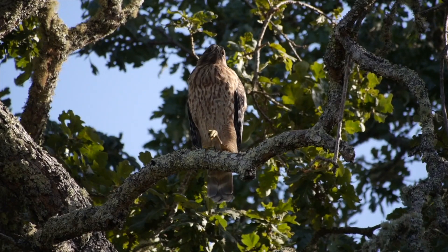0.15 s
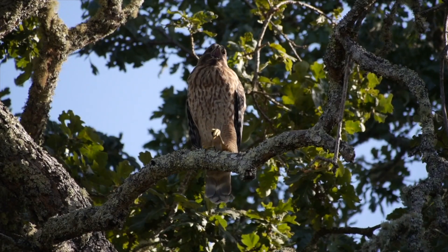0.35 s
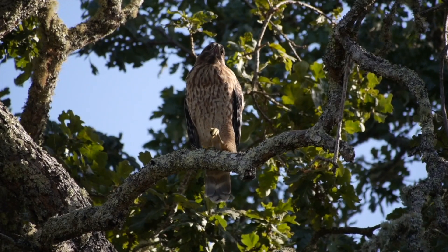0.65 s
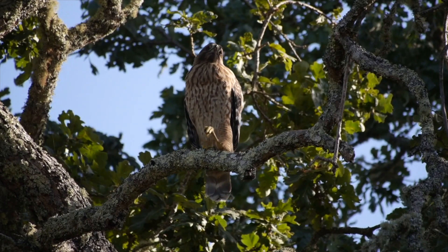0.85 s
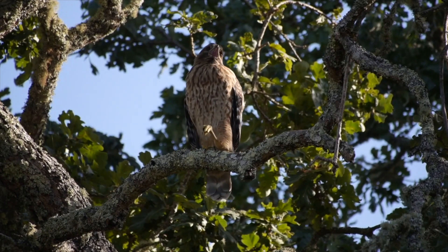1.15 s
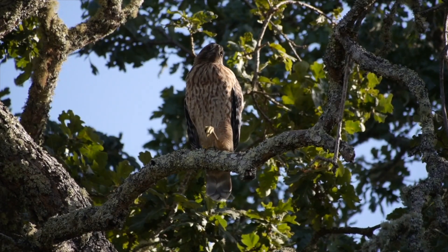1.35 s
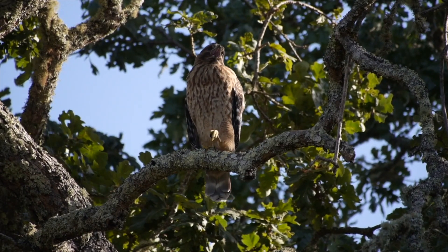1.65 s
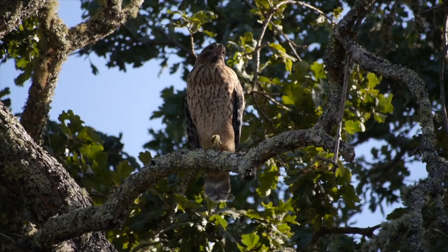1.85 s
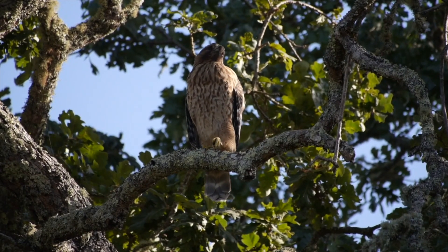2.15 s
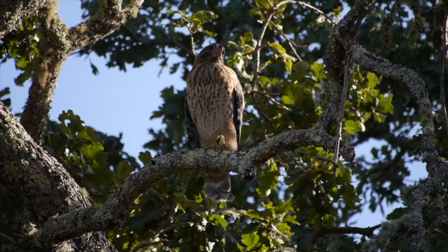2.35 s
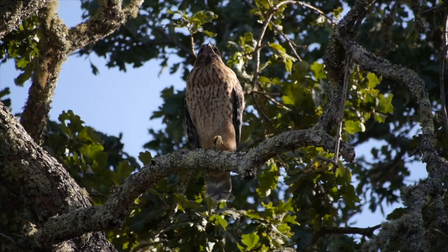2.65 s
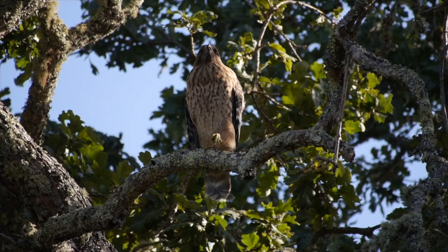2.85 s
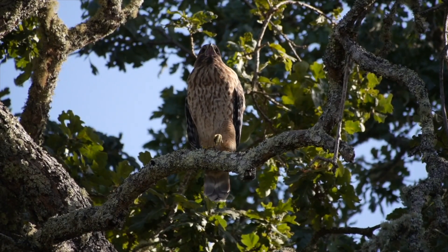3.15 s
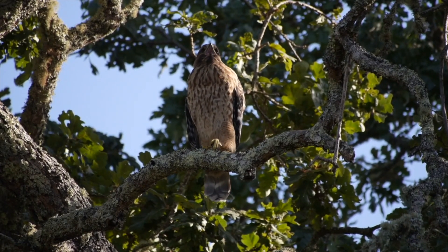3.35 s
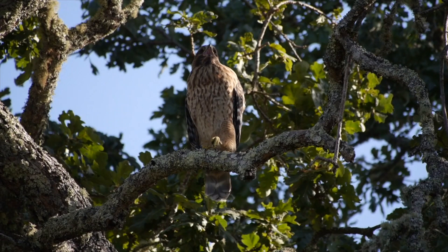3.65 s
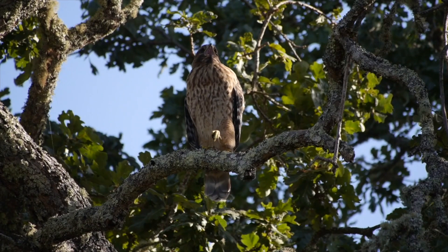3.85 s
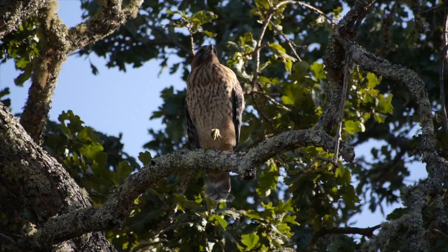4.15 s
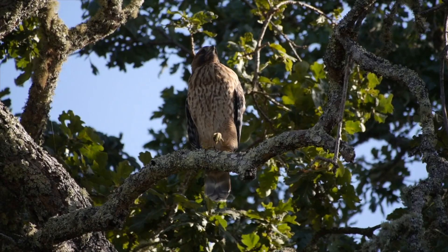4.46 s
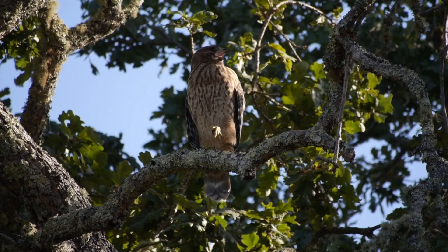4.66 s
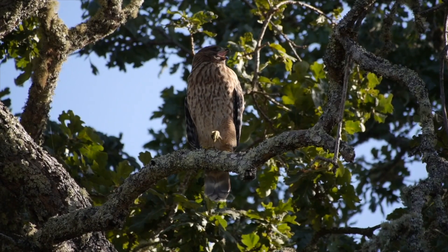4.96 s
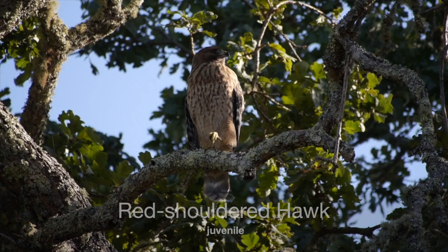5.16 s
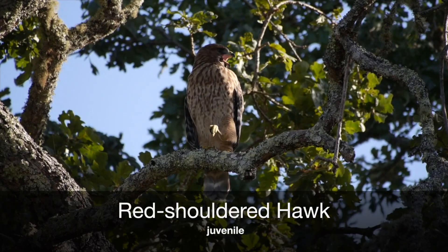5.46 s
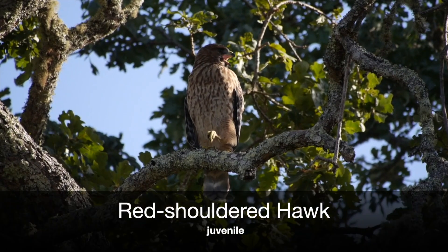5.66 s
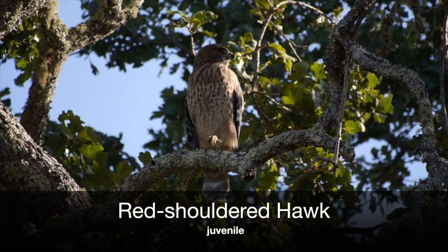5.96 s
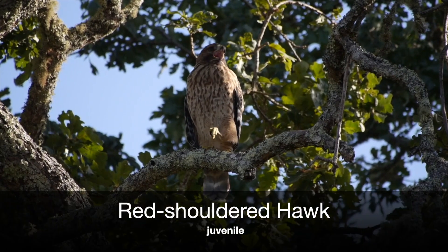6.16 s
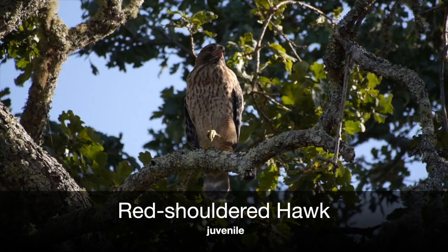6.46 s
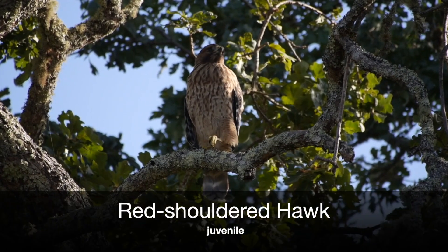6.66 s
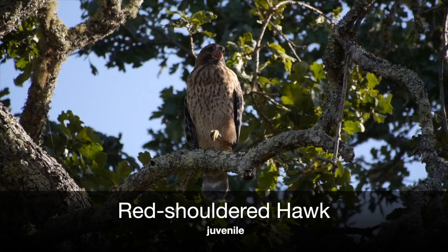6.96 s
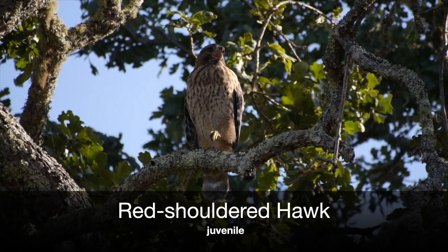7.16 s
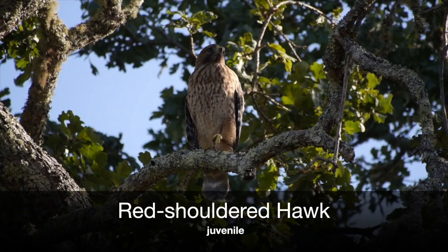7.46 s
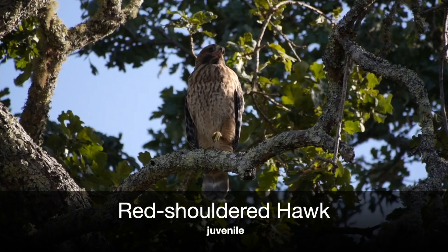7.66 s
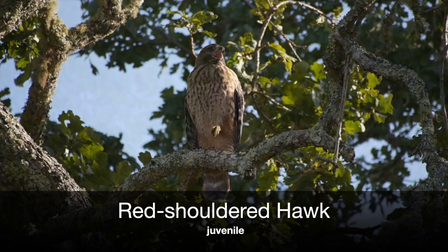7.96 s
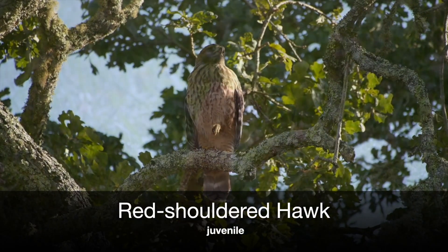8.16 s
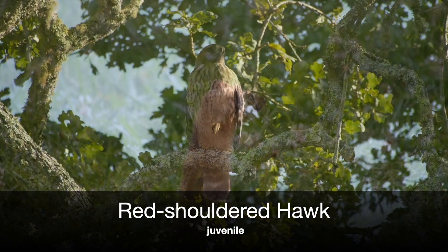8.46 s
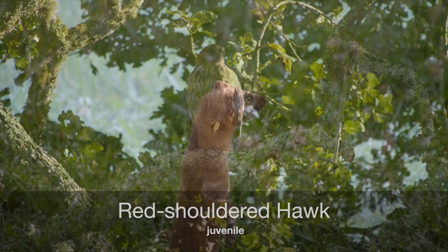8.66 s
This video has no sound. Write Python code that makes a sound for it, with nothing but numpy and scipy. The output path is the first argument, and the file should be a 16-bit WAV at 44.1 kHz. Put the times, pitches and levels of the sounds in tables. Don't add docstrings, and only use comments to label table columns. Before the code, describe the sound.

Outdoors among trees, a hawk is already mid-scream at the start and keeps calling at regular intervals: bright, piercing, downward-sliding notes with a rough ending and a brief woodland reverberation. The background is hushed, with far road rumble, a faint wavering machine tone, small dry ticks, and one tiny bird chirp at six seconds. Calling stops just after eight seconds, leaving faint low motor drone and a few sharper twig clicks. Wide, natural stereo pickup.

```python
import sys
import numpy as np
from scipy import signal
from scipy.fft import rfft, irfft, next_fast_len
from scipy.io import wavfile
from scipy.ndimage import uniform_filter1d

SR = 44100
rng = np.random.default_rng(int(sys.argv[2]) if len(sys.argv) > 2 else 0)


def amplitude_ratio(level_db):
    exponent = np.asarray(level_db, float) / 20
    return 10 ** exponent


def persist_wave(psi):
    counts = np.round(np.clip(psi, -1, 1) * 32767).astype(np.int16)
    wavfile.write(sys.argv[1], SR, np.atleast_2d(counts).T)


N = 388962
SIZE = next_fast_len(N + SR, True)


def along(rows, hz):
    f, db = np.transpose(rows)
    return np.interp(np.log(hz + 1), np.log(f), db)


def colour(x, rows):
    size = next_fast_len(x.shape[-1], True)
    gain = amplitude_ratio(along(rows, np.fft.rfftfreq(size, 1 / SR)))
    return irfft(rfft(x, size) * gain, size)[..., :x.shape[-1]]


def level(x, db):
    return x * amplitude_ratio(db) / np.sqrt(np.mean(x ** 2))


def walk(rate, size=N):
    k = max(int(SR / rate), 2)
    smooth = uniform_filter1d(rng.standard_normal(size), k)
    return level(uniform_filter1d(smooth, k), 0)


def pan(x, db):
    return np.array([x * amplitude_ratio(db / 2), x * amplitude_ratio(-db / 2)])


def place(out, x, s):
    i = int(s * SR)
    return slice(i, i + x.shape[-1]), slice(0, out.shape[-1] - i)


def stages(arch, slide, croak):
    # effort/dB, brightness/dB
    stage_db = [(2.1, 8.5), (3.5, 5), (0.2, 1.5), (4, 3.5), (0.3, 8), (1.8, 4), (0, -0.2), (0.5, -0.5),
                (0.5, 1), (-2.5, 0.6), (-4.5, -4), (-2, -4)]
    start, rise, knee, top_hz, db = arch
    held, shelf, bend, bend_hz, droop_hz = slide
    snap, croak_hz, length, fade_db, bright_db = croak
    slip_s, droop_s, drop_s = 0.025, 0.04, 0.008
    s = [0, rise, (rise + knee) / 2, knee, knee + slip_s, shelf - abs(held), shelf, bend]
    s += [snap - droop_s, snap, snap + drop_s, snap + drop_s + length]
    hz = [1423, top_hz - 14.2, top_hz, top_hz - 41.6, 1540, 1477, 1435, bend_hz]
    hz += [droop_hz, 1158.6, croak_hz, 764]
    effort_db, shine_db = np.transpose(stage_db)
    is_end = np.arange(len(s)) == len(s) - 1
    effort_db = effort_db + db + fade_db * is_end
    return list(zip(start + np.maximum.accumulate(s), hz, effort_db, shine_db + bright_db))


def scream(rows):
    # lead before the first row t/s, f/Hz, drop under it level/dB, brightness change/dB
    crack = [
        (.017, 766, -8.5, 15.5),
        (0.01514, 830, -16.5, -9.5),
        (0.00828, 1000, 0, -9.5),
        (0.00238, 1350, -11.5, 1.5),
    ]
    order_db = [-0.5, -6.5, -9.5, -14, -18, -13, -16, -12, -17, -12, -29, -6, -15.5]
    # f/Hz, level/dB
    throat = [(700, -41.5), (1600, -12), (2100, 2.5), (2550, 6), (3000, -3), (3500, -12), (4300, -19),
              (5200, -12.5), (6200, -17), (8000, -18.5), (10000, -31), (12500, -29), (15500, -42.5)]
    # f/Hz, level/dB
    fundamental = [(750, -21.5), (1200, -16), (1400, -10), (1730, -2.5)]
    # f/Hz, level/dB
    breathiness = [(800, -15.5), (1080, -14), (1200, -48.5), (1450, -35.5), (1700, -31)]
    # f/Hz, level/dB
    rasp = [(1200, -22), (1900, -9.5), (2500, 7), (3100, -5), (3800, -17), (5500, -24), (8000, -36),
            (15500, -50)]
    # f/Hz, level/dB
    turn = [(7000, 0), (10000, 4.5), (12500, 2), (15000, -12)]
    turn_s = 4.45

    s, _, db, bright = rows[0]
    rows = [(s - lead, hz, db + under, bright + dull) for lead, hz, under, dull in crack] + rows
    s, *columns = np.transpose(rows)
    t = np.arange(s[0], s[-1], 1 / SR)
    age = t - s[0]
    curves = [uniform_filter1d(np.interp(t, s, c), size=180, mode="nearest") for c in columns]
    hz, effort_db, bright_db = curves

    low = 1 / (1 + np.exp((hz - 1120) / 40))
    jitter = (0.0025 + 0.006 * low) * walk(400, size=len(t))
    hz = hz * (1 + jitter + 0.0022 * walk(66, size=len(t)))
    phase = 2 * np.pi * np.cumsum(hz) / SR
    gape = 1 + 0.083 * np.exp(-age / 0.069)

    voice = amplitude_ratio(along(fundamental, hz)) * np.sin(phase)
    for k, db in enumerate(order_db, 2):
        flutter_db = 0.68 * min(k, 6) * walk(65, size=len(t))
        gain_db = db * (1 - 0.27 * low) + along(throat, k * hz / gape)
        gain_db = gain_db + bright_db * min((k - 2) / 2, 1.6) + flutter_db
        gain_db = gain_db - 4.0 * max(k - 5, 0) * np.exp(-age / 0.062)
        gain_db = gain_db + along(turn, k * hz) * (s[0] > turn_s)
        can_sound = k * hz < 0.45 * SR
        voice = voice + amplitude_ratio(gain_db) * can_sound * np.sin(k * phase + 6 * rng.random())

    breath = level(colour(rng.standard_normal(len(t)), rasp), 0)
    breath = breath * (1 + 0.42 * np.cos(phase)) * amplitude_ratio(5.1 * walk(70, size=len(t)))
    slips = np.clip(walk(40, size=len(t)) - 0.6, 0, 1) * np.clip((hz - 1500) / 100, 0, 1)
    voice = voice + amplitude_ratio(-14.5) * slips * np.sin(3 * phase / 2)
    voice = voice + breath * amplitude_ratio(along(breathiness, hz))
    edges = np.clip(np.minimum(age / 0.0015, (s[-1] - t) / 0.0087), 0, 1)
    return s[0], voice * amplitude_ratio(effort_db) * edges


def hawk():
    # start t/s, rise t/s, knee after start t/s, top f/Hz, effort level/dB
    arches = [(-0.208, 0.043, 0.09, 1717, -31.5), (0.442, 0.038, 0.097, 1749, -31.5),
              (1.085, 0.042, 0.089, 1753, -30.5), (1.727, 0.044, 0.103, 1742, -30.5),
              (2.384, 0.042, 0.12, 1728, -30.5), (3.118, 0.042, 0.1, 1736, -30.5),
              (3.82, 0.044, 0.11, 1732, -30.5), (4.668, 0.04, 0.12, 1712, -31),
              (5.428, 0.041, 0.091, 1664, -30.5), (6.211, 0.044, 0.1, 1721, -30.5),
              (6.966, 0.05, 0.1, 1717, -30.5), (7.835, 0.061, 0.11, 1723, -31)]
    # shelf held t/s, shelf left at t/s, bend at t/s (both after start), bend f/Hz, droop f/Hz
    slides = [(0.0232, 0.18, 0.249, 1291, 1200), (0.04, 0.172, 0.218, 1287, 1217),
              (0.0088, 0.176, 0.27, 1296, 1236), (0.021, 0.193, 0.217, 1354, 1232),
              (-0.009, 0.185, 0.271, 1269, 1246), (0.018, 0.166, 0.266, 1295, 1236),
              (0.025, 0.2, 0.267, 1295, 1224), (-0.006, 0.192, 0.257, 1393, 1226),
              (0.044, 0.179, 0.203, 1354, 1260), (0.051, 0.208, 0.232, 1334, 1253),
              (0.007, 0.181, 0.283, 1299, 1254), (0.015, 0.196, 0.239, 1353, 1281)]
    # voice breaks after start t/s, drops to f/Hz, length t/s, fade/dB, whole scream's brightness/dB
    croaks = [(.361, 750, 0.03, -37, 0.5), (.347, 827, .03, -24, 1), (.359, 842, .03, -14, 1),
              (.341, 813, 0.021, -22, 1), (.457, 842, .032, -15, 0.5), (.387, 874, 0.032, -8, 1),
              (.399, 890, 0.036, -10.5, 1), (.445, 990, .06, -9, -2.5), (.383, 1053, .072, -7, -5),
              (.385, 1050, .052, -3, -1.5), (.403, 1013, .056, -8, -1), (.393, 1036, .056, -7, -2)]
    # f/Hz, level/dB
    ground = [(500, -12.5), (1300, -2.6), (2700, -1.0), (4000, 3), (7000, -15), (15000, -16.5)]
    # delay t/s, time to fade by 60 dB t/s, level/dB, treble slope/dB per octave
    trees = [
        (.003, 0.19, -5.5, 3.5),
        (0.021, 0.35, -16.5, -0.5),
        (0.049, 2.2, -29.5, 0),
    ]
    # f/Hz, level/dB
    trees_colour = [(500, 5), (2500, -1.5), (4000, 6), (6000, 4), (9000, -2.5), (15000, 1)]
    # f/Hz, left minus right level/dB
    hawk_pan = [(700, 6), (1500, -2), (2600, -2.5), (4400, -3.5), (8000, 5.5), (12000, 5.5), (15000, 3.5)]

    lead = SR
    calls = np.zeros(SIZE)
    for plan in zip(arches, slides, croaks):
        s, voice = scream(stages(*plan))
        into, _ = place(calls, voice, s + 1)
        calls[into] += voice

    f = np.fft.rfftfreq(len(calls), 1 / SR)
    comb_hz = np.array([[171.7], [171.5]])
    ground_shift_hz = 19
    bounce = amplitude_ratio(along(ground, f)) * np.exp(-2j * np.pi * (f - ground_shift_hz) / comb_hz)
    near = irfft(rfft(calls) * (1 + bounce) * pan(0.84, along(hawk_pan, f)), len(calls))

    t = np.arange(2 * SR) / SR
    scatter = 0
    for delay, t60, db, treble_db in trees:
        mid, side = colour(rng.standard_normal((2, len(t))), [(3000, 0), (12000, 2 * treble_db)])
        tail = np.array([mid + 0.74 * side, mid - 0.17 * side])
        tail = tail * (t > delay) * 1000. ** (-t / t60)
        scatter = scatter + amplitude_ratio(db) * tail / np.sqrt(np.sum(tail ** 2) / 2)
    wet = signal.fftconvolve(colour(calls, trees_colour)[None], scatter, axes=1)[:, :len(calls)]
    return (near + wet)[:, lead:lead + N]


def motor(t):
    # f/Hz, level/dB
    tones = [(80.5, -9), (123.8, -8), (161.5, -3), (177.6, -4.5), (242.2, -9), (322, -14), (403.7, -5.5),
             (942, -13.5), (1120, -19), (1281, -19)]
    # f/Hz, level/dB
    rumble_colour = [(40, -19), (100, -3), (170, -2.5), (300, -10), (600, -30), (1500, -12.5), (4000, -36),
                     (9000, -66)]
    # t/s, level/dB
    fade = [
        (8.0, -73),
        (8.3, -67.5),
        (8.55, -60),
        (8.82, -54.5),
    ]
    start = int(7.9 * SR)
    t = t[start:]
    lines = 0
    for hz, db in tones:
        wander_db = 0.98 * walk(6, size=len(t))
        lines = lines + amplitude_ratio(db + wander_db) * np.sin(2 * np.pi * (hz * t + rng.random()))
    rumble = colour(rng.standard_normal(len(t)), rumble_colour)
    drone = level(lines, 0) + level(rumble, -4)
    drone = drone * amplitude_ratio(np.interp(t, *np.transpose(fade), left=-120))
    return pan(np.pad(drone, (start, 0)), 0.35)


def rustles():
    # t/s, length t/s, centre f/Hz, width f/Hz, level/dB, left minus right level/dB
    brushes = [
        (0.903, 0.44, 1080, 1210, -56, -1),
        (1.607, 0.1, 3940, 900, -67, -11),
        (2.11, 0.23, 5800, 507, -74, -3),
        (7.435, 0.29, 5600, 2160, -70.5, 2),
        (8.513, 0.034, 3320, 3250, -58.5, 7),
        (8.554, 0.35, 2000, 3170, -64, 0),
    ]
    sounds = []
    for s, length, hz, width, db, pan_db in brushes:
        size = int(length * SR)
        band = [(max(hz - 2 * width, 60), -30), (hz - width / 2, -3), (hz, 0), (hz + width / 2, -3)]
        band += [(hz + 2 * width, -30), (hz + 5 * width, -70)]
        grains = rng.standard_normal((2, size)) * amplitude_ratio(1.8 * walk(150, size=size))
        brush = level(colour(grains + grains[0], band), db)
        sounds.append((s, brush * np.hanning(size) ** 0.5 * pan(np.ones(1), pan_db)))
    return sounds


def ticks():
    # t/s, peak level/dB, centre f/Hz, left minus right level/dB
    snaps = [
        (0.9254, -52, 4800, 14),
        (1.6674, -50, 3665, -5),
        (2.1444, -41, 3160, -2),
        (3.077, -57, 2900, -10),
        (6.0734, -58, 3860, -7),
        (7.751, -62, 3970, -14),
        (8.5563, -37, 2960, 11),
        (8.659, -41, 2410, 6),
        (8.743, -48.5, 3220, 4),
    ]
    t = np.arange(256) / SR
    sounds = []
    for s, db, hz, pan_db in snaps:
        noise = uniform_filter1d(rng.standard_normal(len(t)), size=3)
        snap = (np.sin(2 * np.pi * hz * t) + 0.5 * noise) * np.exp(-t / 0.0003)
        sounds.append((s, pan(amplitude_ratio(db) * snap, pan_db)))
    return sounds


def small_bird():
    # t/s, f/Hz, level/dB
    chirp_path = [
        (6.005, 6432, -79),
        (6.033, 6613, -77),
        (6.053, 6360, -72),
        (6.081, 5836, -74),
        (6.089, 5968, -82),
    ]
    s, hz, db = np.transpose(chirp_path)
    t = np.arange(s[0], s[-1], 1 / SR)
    phase = 2 * np.pi * np.cumsum(np.interp(t, s, hz)) / SR
    chirp = np.sqrt(2) * amplitude_ratio(np.interp(t, s, db)) * np.sin(phase)
    return [(s[0], pan(chirp * np.hanning(len(t)) ** 0.15, 0.1))]


def small_sounds():
    out = np.zeros((2, N))
    for s, x in rustles() + ticks() + small_bird():
        into, kept = place(out, x, s)
        out[:, into] += x[:, kept]
    return out


def hum(t):
    # t/s, level/dB
    hum_path = [(0.0, -76), (0.7, -68), (1.2, -69.5), (2.6, -71), (2.92, -66.5), (3.9, -80), (5.36, -79),
                (7.5, -69), (8.82, -74.5)]
    db = np.interp(t, *np.transpose(hum_path)) + 2.6 * walk(17)
    hz = 778.5 + 2.0 * walk(4.16)
    tone = np.sin(2 * np.pi * np.cumsum(hz) / SR)
    return pan(np.sqrt(2) * amplitude_ratio(db) * tone, 3.0)


def traffic():
    # f/Hz, level/dB per Hz
    road = [(20, -22.5), (40, -32.5), (63, -9.5), (120, -5.5), (250, -8.5), (580, -15), (800, -12.5),
            (1400, -17), (2200, -23), (3600, -29.5), (5800, -35.5), (9000, -44.5), (13000, -44.5),
            (15500, -56.5)]
    # f/Hz, level/dB
    road_side = [(25, -26.5), (125, -22), (250, -13.5), (600, -2.5), (1400, -8.5), (5000, -3.5),
                 (15000, -19.5)]
    # f/Hz, left minus right level/dB
    road_pan = [(60, 1), (200, 0.5), (700, 3), (1300, 0.5), (2400, -1.5), (15000, 0)]
    f = np.fft.rfftfreq(SIZE, 1 / SR)
    mid, side = rfft(rng.standard_normal((2, SIZE))) * amplitude_ratio(along(road, f))
    side = side * amplitude_ratio(along(road_side, f))
    both = np.array([mid + side, mid - side]) * pan(1, along(road_pan, f))
    out, swell = 0, walk(1.0)
    for octave in range(4, 16, 2):
        share = np.clip(1 - np.abs(np.log2(f + 1) - octave) / 2, 0, 1)
        flicker = 0.21 * walk(0.78)
        out = out + irfft(both * share, SIZE)[:, :N] * amplitude_ratio(0.5 * swell + flicker)
    return level(out, -60.5)


def scene():
    t = np.arange(N) / SR
    return hawk() + motor(t) + small_sounds() + hum(t) + traffic()


def band_limit(x):
    return signal.sosfilt(signal.butter(12, 15650, fs=SR, output="sos"), x)


def record(dry):
    top_cut = signal.ellip(8, 0.2, 60, 15400, fs=SR, output="sos")
    mix = signal.sosfilt(top_cut, dry) - 0.0017
    return band_limit(mix)


dry = scene()
out = record(dry)
persist_wave(out)
```